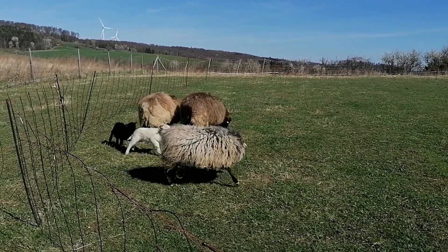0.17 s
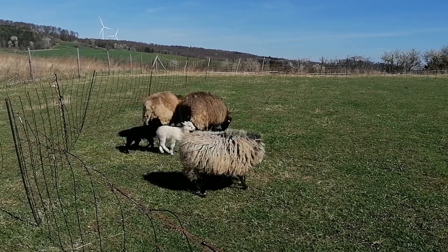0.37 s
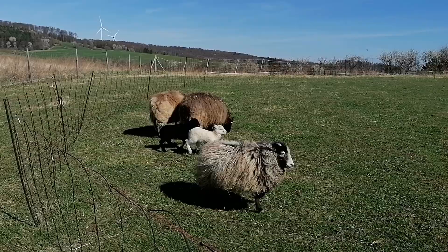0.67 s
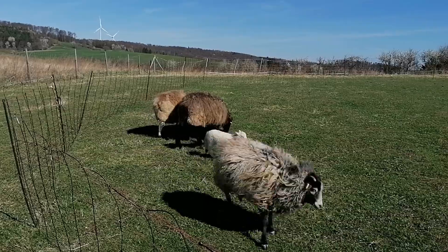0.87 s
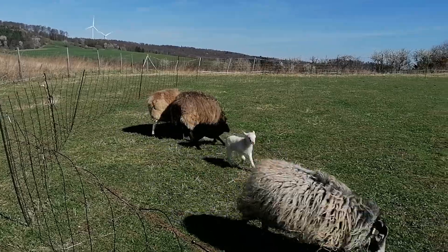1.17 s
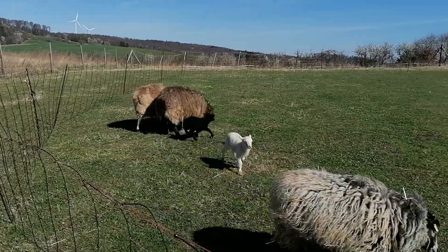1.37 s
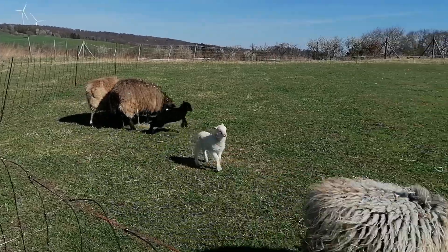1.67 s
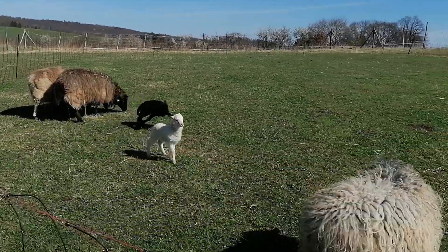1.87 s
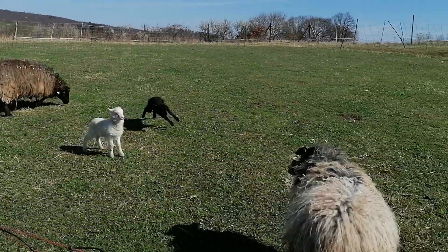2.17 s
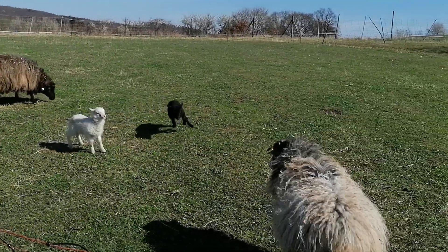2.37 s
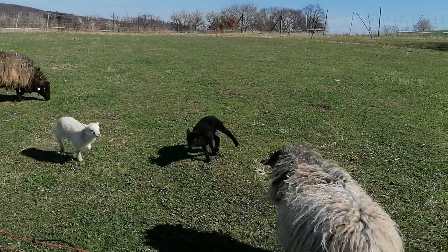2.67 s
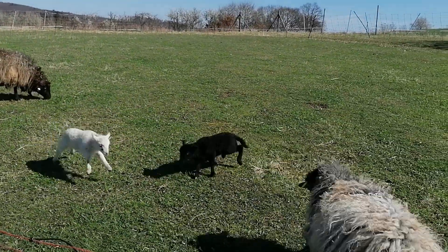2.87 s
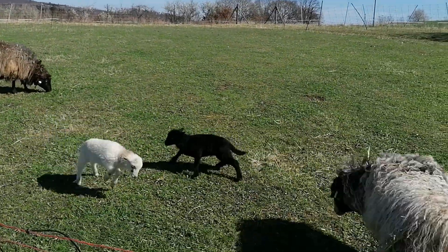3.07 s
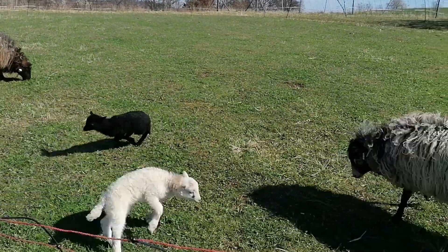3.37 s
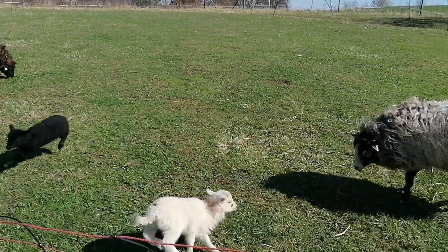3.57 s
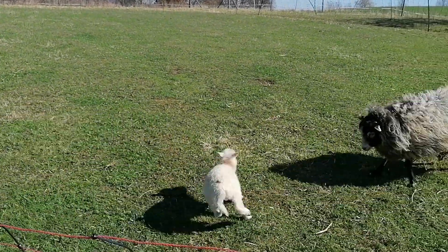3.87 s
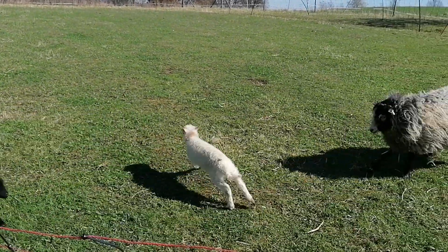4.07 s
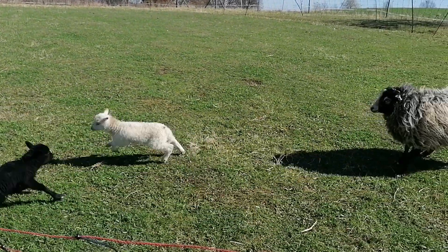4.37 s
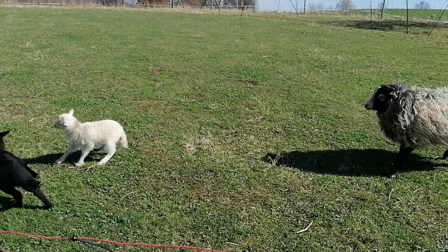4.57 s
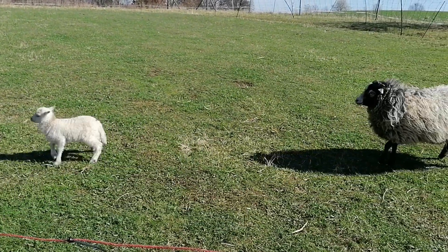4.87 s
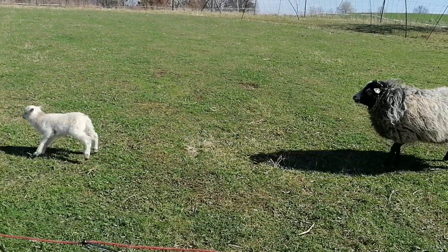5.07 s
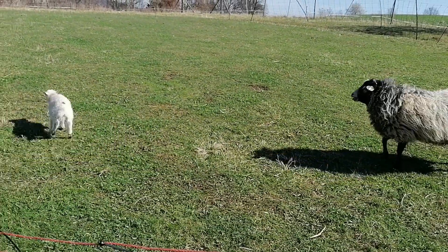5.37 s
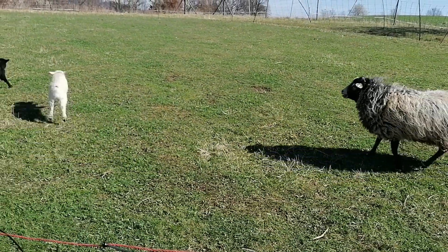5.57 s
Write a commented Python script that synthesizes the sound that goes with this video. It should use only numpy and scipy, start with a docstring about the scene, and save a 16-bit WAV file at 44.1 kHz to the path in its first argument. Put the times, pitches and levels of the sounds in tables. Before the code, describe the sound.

In an open pasture, a faint trembling lamb call gives way to grassy hoof steps and a close, rasping sheep bleat above low rotor rumble.

```python
"""Sheep on a pasture

A lamb gives a thin quavering bleat, hooves rustle through the grass, then a nearer sheep grunts and
bleats hoarsely in rasping bursts: vocal fold pulses and leaking air through throat, mouth and nose.
A distant helicopter throbs under it all (pulse trains and hum); filtered noise makes the swells of air,
tiny ticks the grass and one gliding sine a far bird."""
import sys
import numpy as np
from scipy import signal
from scipy.fft import rfft, irfft, next_fast_len
from scipy.io import wavfile
from scipy.ndimage import uniform_filter1d, map_coordinates

SR = 44100
rng = np.random.default_rng(int(sys.argv[2]) if len(sys.argv) > 2 else 0)


def store_pcm(level_fs):
    """Save levels as 16-bit WAV."""
    pcm = np.round(np.clip(level_fs, -1, 1) * 32767).astype(np.int16)
    wavfile.write(sys.argv[1], SR, np.atleast_2d(pcm).T)


N = 252252
TIME = np.arange(N) / SR


def amp(db):
    """Decibels to gain."""
    return 10 ** (np.asarray(db) / 20)


def unit(x):
    """Scale to rms 1."""
    return x / np.sqrt(np.mean(x ** 2) + 1e-20)


def curve(rows, axis=1):
    """One value per sample from a column of (t/s, ..) rows."""
    columns = np.transpose(rows)
    return np.interp(TIME, columns[0], columns[axis])


def wobble(rate):
    """A smooth random curve, rate knots a second."""
    return map_coordinates(rng.standard_normal(int(N * rate / SR) + 4), [TIME * rate])


def colour(x, points):
    """Causal minimum-phase filter with the gain of the (f/Hz, gain/dB) points."""
    m = 2 * next_fast_len(len(x))
    hz, db = np.transpose(points)
    gain = amp(np.interp(np.log(np.fft.rfftfreq(m, 1 / SR) + 1), np.log(hz), db))
    # folding the cepstrum gives the phase
    cepstrum = irfft(np.log(gain + 1e-6))
    cepstrum[1:m // 2] *= 2
    cepstrum[m // 2 + 1:] = 0
    return irfft(rfft(x, m) * np.exp(rfft(cepstrum)))[:len(x)]


def resonate(x, hz, width_hz):
    """One resonance."""
    return signal.lfilter(*signal.iirpeak(hz, hz / width_hz, SR), x)


def gliding(x, hz, width_hz):
    """A resonance whose frequency moves from sample to sample, rms 1."""
    carrier = np.exp(2j * np.pi * np.cumsum(hz) / SR)
    lowpass = signal.butter(2, width_hz / 2, fs=SR, output='sos')
    return unit((signal.sosfilt(lowpass, x / carrier) * carrier).real)


def noise(points):
    """Coloured noise of rms 1."""
    return unit(colour(rng.standard_normal(N), points))


def pulses(cycles, scatter_db):
    """A pulse of random size wherever the cycle count passes a whole number, rms 1."""
    at = np.interp(np.arange(1, int(cycles[-1]) + 1), cycles, np.arange(N))
    taps = np.round(at).astype(int)[:, None] + np.arange(-8, 9)
    # windowed sinc places each pulse between samples
    shape = np.sinc(taps - at[:, None]) * np.hanning(taps.shape[1])
    sizes = amp(scatter_db * rng.standard_normal((len(at), 1)))
    return unit(np.bincount(np.clip(taps, 0, N - 1).ravel(), (shape * sizes).ravel(), N))


def hump(centre_s, half_s, steep=2):
    """A rounded swell of height 1; steeper means flatter on top."""
    out = np.zeros(N)
    reach = 4 * abs(half_s)
    near = slice(*np.searchsorted(TIME, [centre_s - reach, centre_s + reach]))
    out[near] = np.exp(-np.abs((TIME[near] - centre_s) / half_s) ** steep)
    return out


def sized(x, db, length_s):
    """Give a short sound the level it has when spread over its length."""
    return x * amp(db) * np.sqrt(length_s * SR / (np.sum(x ** 2) + 1e-20))


def helicopter(first_pass=0.55, slap_lead_s=0.0035, overtones_db=-2):
    """Main blades thump twenty times a second, slapping harder when louder; the geared tail rotor hums."""
    # blade passes: t/s, rate/Hz
    blade_rate = [(0, 20.13), (2.2, 20.18), (3, 20.09), (4.2, 20.03), (5.7, 20.09)]
    # throb, swelling and fading on the wind: t/s, nominal level/dB
    rotor = [(0.0, -49.5), (0.67, -50.5), (1.1, -53.5), (4.64, -48), (4.76, -43), (5.64, -40.5),
             (5.72, -41.5)]
    # tail rotor overtones: t/s, nominal level/dB
    whine = [(0.0, -60), (0.67, -63), (2.7, -65.5), (3.05, -59), (3.8, -55), (4.32, -65), (5.69, -47)]
    # tail rotor overtones: multiple of the hum, relative level/dB
    tail_overtones = [(2, 2.5), (3, -14.5), (4, -8)]
    # thump spectrum: f/Hz, gain/dB
    thump_spectrum = [(10, -5), (20, -9), (40, 9.5), (60, 5.5), (82, 3.5), (120, -6), (160, -14),
                      (260, -28), (500, -68)]
    # against the mean throb; growth in dB for each dB of throb
    thump_db, slap_db, hum_db = -0.5, -7.5, -5
    thump_grows, slap_grows, hum_grows = 0.75, 1.92, 1.62

    passes = np.cumsum(curve(blade_rate)) / SR
    blades = pulses(passes + first_pass, scatter_db=.9)
    thumps = unit(colour(blades, thump_spectrum))
    early = np.interp(TIME + slap_lead_s, TIME, blades)
    slaps = unit(resonate(resonate(early, hz=86.5, width_hz=28.3), hz=91.0, width_hz=92))

    tail_turns = 4.61 * passes

    def tone(multiple):
        level = amp(2.6 * wobble(8))
        return level * np.sin(2 * np.pi * multiple * tail_turns + .9 * wobble(9))

    overtones = sum(amp(db) * tone(multiple) for multiple, db in tail_overtones)
    throb_db = curve(rotor)
    mean_db = throb_db.mean()

    def gain(db, grows):
        return amp(mean_db + db + grows * (throb_db - mean_db))

    main = gain(thump_db, thump_grows) * thumps + gain(slap_db, slap_grows) * slaps
    return main + gain(hum_db, hum_grows) * tone(1) + amp(curve(whine) + overtones_db) * overtones


def air(floor_db=-61, gust_width_hz=210, whoosh_db=-4.5, grows=1.53, roar_db=-1.0, roar_grows=1.28):
    """Low outdoor murk, a soft whoosh that rises in pitch as it swells, and a duller roar below it."""
    # murk spectrum: f/Hz, gain/dB
    floor_spectrum = [(50, -21), (100, -1), (139, -6.5), (239, -16), (413, -18.5), (615, -10.5),
                      (1160, -26), (4300, -41.5), (5540, -39.5), (6650, -39), (7280, -42.5), (7690, -58.5),
                      (10000, -74.5)]
    # spectrum of the noise behind whoosh and roar: f/Hz, gain/dB
    flow = [(60, -17.5), (150, 10), (750, -2.5), (950, -5.5), (1250, -33.5), (3000, -40.5)]
    # low rush of air: t/s, nominal level/dB
    whoosh_levels = [(0.0, -54), (0.24, -72.5), (1.1, -58.5), (1.35, -65), (2.4, -69.5), (2.82, -56.5),
                     (3.08, -48), (3.38, -57), (4.3, -63.5), (4.72, -52.5), (4.95, -55), (5.08, -48),
                     (5.23, -44.5), (5.37, -45), (5.53, -57.5), (5.72, -57.5)]
    # dull roar: t/s, nominal level/dB
    roar_levels = [(0.0, -60.5), (0.21, -62), (2.75, -62.5), (2.85, -60.5), (3.95, -63), (5.02, -53.5),
                   (5.1, -47), (5.32, -46), (5.72, -58)]
    weak_db, strong_db, weak_hz, strong_hz = -61.5, -48, 514, 666

    def swell(db, grows):
        return amp(db.mean() + grows * (db - db.mean()))

    floor = amp(floor_db + 1.5 * wobble(4)) * noise(floor_spectrum)
    level_db = curve(whoosh_levels)
    centre_hz = np.interp(level_db, [weak_db, strong_db], [weak_hz, strong_hz])
    whoosh = gliding(noise(flow), centre_hz, gust_width_hz)
    roar = unit(amp(2.3 * wobble(30)) * resonate(noise(flow), hz=370, width_hz=410))
    out = floor + amp(whoosh_db) * swell(level_db, grows) * whoosh
    return out + amp(roar_db) * swell(curve(roar_levels), roar_grows) * roar


def crackle(centre_hz, spread_octaves, grains_per_s, life_s):
    """Dense tiny ticks, each a decaying sine with its own pitch and size, rms 1."""
    when, pitch, size = rng.random((int(grains_per_s * N / SR), 3)).T[:, :, None]
    t = TIME[:SR // 200]
    hz = centre_hz * 2 ** (spread_octaves * (2 * pitch - 1))
    envelope = np.exp(-t / life_s) * (1 - np.exp(-2 * t / life_s))
    ticks = amp(-3.2 * np.log(size + 0.015)) * np.sin(2 * np.pi * hz * t) * envelope
    at = (when * N).astype(int) + np.arange(len(t))
    return unit(np.bincount(at.ravel(), ticks.ravel(), N)[:N])


def grass(crunch_db=-3, swish_db=0, flutter_db=1.8):
    """Hooves crunch the turf and brush the blades; now and then a dry stalk snaps."""
    # running through the grass: t/s, nominal level/dB
    rustle = [(1.3, -76.5), (2.15, -74.5), (2.65, -79), (2.85, -75), (2.92, -63.5), (3.28, -73),
              (3.98, -71.5), (4.45, -82)]
    # hoof strokes that stand out: centre t/s, length/s, crunch level/dB, fine swish level/dB
    steps = [(0.35, 0.019, -63.5, -67), (1.583, 0.017, -73, -67), (1.823, 0.15, -69, -70),
             (2.084, 0.071, -69, -74), (2.768, 0.018, -64, -65), (2.99, 0.036, -70.5, -78),
             (3.093, 0.076, -63.5, -67), (3.21, 0.052, -70, -72), (3.38, 0.072, -78, -65.5),
             (3.479, 0.04, -77, -62.5), (3.577, 0.023, -62, -59.5), (3.651, 0.035, -67, -65),
             (3.85, 0.15, -94, -65.5), (4.076, 0.029, -83, -63.5), (4.221, 0.069, -84, -68),
             (4.376, 0.13, -80, -70), (4.535, 0.052, -82, -66.5), (4.624, 0.049, -81, -60.5),
             (4.89, 0.0051, -86, -62)]
    # dry stalks: t/s, peak level/dB, f/Hz, splintering against the tick (ratio)
    snaps = [(0.518, -47.5, 3870, 2.4), (0.982, -46, 4540, 0.86), (1.188, -53, 2960, 2.3),
             (2.0707, -47, 1855, 1.5), (2.7285, -43, 6350, 1.2), (2.91, -34, 6500, 1.2),
             (2.9864, -51, 5780, 1), (3.0968, -36, 6700, 0.64), (3.1186, -52, 3580, 1.2),
             (3.7065, -43.5, 6900, 1), (3.8196, -35, 6840, 0.083), (4.3264, -45, 7100, 0.55),
             (4.9508, -50.5, 6700, 1.2)]

    running = amp(curve(rustle))
    tread = amp(crunch_db) * running + sum(amp(db) * hump(s, length / 2) for s, length, db, _ in steps)
    brush = amp(swish_db) * running + sum(amp(db) * hump(s, length / 2) for s, length, _, db in steps)
    crunch = crackle(3200, spread_octaves=.85, grains_per_s=2200, life_s=0.0004)
    swish = crackle(6630, spread_octaves=0.28, grains_per_s=2600, life_s=0.00018)
    out = tread * amp(flutter_db * wobble(90)) * crunch
    out += brush * amp(flutter_db * wobble(90)) * swish

    t = TIME[:SR // 20]
    for s, db, hz, splinter in snaps:
        tick = np.sin(2 * np.pi * hz * t) * np.exp(-t / 0.0011)
        # the fibres splinter for a few milliseconds more
        fibres = resonate(rng.standard_normal(len(t)), hz=0.86 * hz, width_hz=3200) * np.exp(-t / 0.0061)
        snap = tick + splinter * fibres
        out[round(s * SR):][:len(t)] += amp(db) * snap / np.abs(snap).max()
    return out


def quaver_pitch(centre_s, length_s, top_hz):
    """Pitch in Hz: every quaver starts tight, jumps to its top, holds if it is long and sags to a creak."""
    onset_hz, creak_hz = 261, 198.4
    # tight this long around the start; at the top after this share of the length
    tight_s, rise_share = 0.0091, 0.38
    # the sag runs from before the end to past it
    sag_s, sag_past_s = 0.019, 0.017

    knots = []
    for start, length, hz in zip(centre_s - length_s / 2, length_s, top_hz):
        top = start + rise_share * length
        knots += [(start - tight_s, onset_hz),
                  (min(start + tight_s, (start + top) / 2), onset_hz),
                  (top, hz),
                  (max(top, start + length - sag_s), hz),
                  (start + length + sag_past_s, creak_hz)]
    return curve(sorted(knots))


def lamb(between=0.085, edge_between=0.1, edge_lag_s=0.003, jitter=0.069, creak_size=0.83,
         break_db=-10, flare_db=-11):
    """Vocal fold pulses whose pitch and force arch in each quaver, through mouth and nose."""
    # quavers: centre t/s, length/s, top pitch f/Hz, mouth level/dB, nasal edge level/dB,
    # strongest side resonance f/Hz, its level/dB
    quavers = [(0.456, 0.032, 286.7, -69, -58.5, 4440, -60), (0.54, 0.038, 294.3, -67.5, -59, 4250, -68),
               (0.68, 0.094, 281.2, -51, -45.5, 4240, -56.5), (0.783, .041, 306.5, -49.5, -48, 3360, -84),
               (0.86, 0.042, 307.8, -49.5, -52, 3330, -55), (0.941, .05, 302.7, -56.5, -59, 2471, -69),
               (1.035, 0.058, 287, -61, -60.5, 3500, -86), (1.101, 0.071, 285.2, -62, -61.5, 2520, -73)]
    # mouth resonances: f/Hz, gain/dB
    mouth_spectrum = [(500, -38), (620, -4.5), (850, -29), (1120, -15), (1390, 3), (1700, -20), (2150, -47),
                      (2520, -15), (2750, -44), (3470, -7), (4000, -16.5), (4550, -10.5), (5200, -49)]
    # nasal resonances: f/Hz, gain/dB
    edge_spectrum = [(4300, -19), (5050, -6), (5350, 1), (5650, 2.5), (6060, 8), (6400, -3), (6800, -3),
                     (7600, -27)]
    # share of breath noise in the strongest and in the weakest quaver
    rough_loud, rough_soft = 0.056, 0.347

    s, length, top_hz, mouth_db, edge_db, ring_hz, ring_db = np.transpose(quavers)
    bounds = np.ravel([s - length / 2, s + length / 2], 'F')

    def step(column):
        return np.interp(TIME, bounds, np.repeat(column, 2))

    # long notes hold level, short quavers swell and fade
    firmness = length / .017

    def arches(lag_s):
        return sum(hump(c + lag_s, d / 2, f) for c, d, f in zip(s, length, firmness))

    push, late = arches(0), arches(edge_lag_s)
    voiced = uniform_filter1d(1. * ((TIME > s[0]) & (TIME < s[-1])), size=400)
    loudness_range = [mouth_db.min(), mouth_db.max()]
    roughness = np.clip(np.interp(step(mouth_db), loudness_range, [rough_soft, rough_loud]), 0, 1)
    pitch_hz = quaver_pitch(s, length, top_hz) * (1 + jitter * roughness * wobble(120))
    cycles = np.cumsum(pitch_hz) / SR
    # air leaks through the folds once a cycle
    leak = unit(rng.standard_normal(N) * np.exp(-4 * (cycles % 1)))
    folds = np.sqrt(1 - roughness) * pulses(cycles, scatter_db=2.7) + np.sqrt(roughness) * leak

    # from the fourth quaver on: a bright creak first, a break upward, a flare as the mouth opens
    creak = creak_size * sum(hump(c - .022, 0.0066) for c in s[3:])
    breaks = sum(hump(c - .007, 0.0075) for c in s[3:])
    flare_tone = unit(resonate(resonate(folds, hz=1600, width_hz=160), hz=1760, width_hz=310))
    flare = amp(flare_db) * sum(hump(c, 0.022) for c in s[3:]) * flare_tone

    mouth_force = push + between * voiced * (1 - push)
    mouth = amp(step(mouth_db)) * (mouth_force * unit(colour(folds, mouth_spectrum)) + flare)
    edge_force = late + creak + edge_between * voiced * (1 - late)
    edge = amp(step(edge_db) + break_db * breaks) * edge_force * unit(colour(folds, edge_spectrum))
    ring = amp(step(ring_db)) * push * gliding(folds, step(ring_hz), width_hz=320)
    return mouth + edge + ring


def bird(db=-71):
    """One thin, far whistle: a gliding sine."""
    # whistle: t/s, f/Hz
    chirp = [(1.385, 3640), (1.41, 3540), (1.455, 3650)]
    return amp(db) * hump(1.42, 0.03, 2.6) * np.sin(2 * np.pi * np.cumsum(curve(chirp)) / SR)


def rattle(cycles, leak_share):
    """Slack vocal folds: one pulse a cycle, each followed by a puff of air."""
    share = np.clip(leak_share, 0, 1)
    leak = unit(rng.standard_normal(N) * np.exp(-1.7 * (cycles % 1)))
    return np.sqrt(1 - share) * pulses(cycles, scatter_db=1.8) + np.sqrt(share) * leak


def hoarse_bleat(throat_width_hz=48, steep=4.3, trail_db=-22, upper_width_hz=520, grunt_nasal_db=-11,
                 leak_share=0.7, jitter=0.028, linger_db=-9, grunt_hz=185, grunt_trail_db=-20):
    """Muffled grunts, then slack folds rattle in bursts that ring the throat, ever less nasal as it opens."""
    # grunts: centre t/s, length/s, level/dB
    grunts = [(4.972, .008, -67), (4.997, 0.006, -58), (5.055, 0.0063, -48), (5.069, 0.0054, -48),
              (5.13, 0.022, -42)]
    # grunt spectrum: f/Hz, gain/dB
    grunt_spectrum = [(500, -22), (900, -14), (1250, 15), (1700, -8.5), (2050, 5), (2350, -7.5), (2620, 2),
                      (2950, -25.5), (3120, -6), (4000, -23.5), (8000, -50)]
    # bursts: centre t/s, length/s, pitch f/Hz, nominal throat level/dB, upper resonance drive/dB,
    # catch level/dB
    bursts = [(5.214, 0.018, 181, -25.5, -44, -58), (5.29, 0.027, 187, -31, -38.5, -55),
              (5.366, .026, 190, -25, -37.5, -43.5), (5.442, 0.023, 194.8, -24.5, -40, -45),
              (5.518, 0.021, 193.1, -26, -34, -46.5), (5.592, 0.021, 193.7, -24.5, -37, -50),
              (5.672, 0.022, 259.7, -25.5, -32.5, -44.5)]
    # voice cutting out inside a burst: t/s, depth (0-1)
    hitches = [(5.287, 1), (5.367, 0.8), (5.44, 0.3), (5.514, .55)]
    # rasp spectrum: f/Hz, gain/dB
    rasp_spectrum = [(400, -21.5), (620, 7), (950, 6), (1110, -9.5), (1350, 2), (1550, 2.5), (1830, 7),
                     (2050, -3), (2400, -4.5), (2650, 9.5), (2980, -3), (3300, -17), (3550, -23),
                     (4250, -19.5), (5200, -33), (6600, -22), (8000, -40.5)]
    # nasal spectrum: f/Hz, gain/dB
    nasal_spectrum = [(4750, -14.5), (5050, -4), (5280, 4), (5900, 1), (6400, -10), (8000, -16)]
    # mouth nearly shut, then wide open; time constant of its opening from the first burst on
    throat_ends_hz, rasp_ends_db, nasal_ends_db = (723, 767), (-36.5, -31.5), (-49.5, -69.5)
    opening_s = 0.18
    # the folds catch before each burst: two tight squeaks, the second lower
    catch_hz, catch_lead_s, squeak_gap_s, squeak_decay_s = (3650, 3050), .028, 0.0075, 0.006
    # narrow resonances that ring on between the bursts
    linger_hz = (1856, 3020)
    # the upper resonance lifts as the throat shuts after each burst
    upper_base_hz, upper_rise_hz = 2684, 780

    s = np.transpose(bursts)[0]

    def opened(t, shut, wide):
        return wide + (shut - wide) * np.exp(-np.maximum(t - s[0], 0) / opening_s)

    # jittered time in s; times a pitch it counts cycles
    bend = np.cumsum(1 + jitter * wobble(200)) / SR
    hitch = 1 - np.clip(sum(depth * hump(c, 0.0024) for c, depth in hitches), 0, 1)
    grunt = unit(colour(rattle(grunt_hz * bend, leak_share), grunt_spectrum))
    nasal, breath = noise(nasal_spectrum), noise(rasp_spectrum)
    tract = colour(signal.unit_impulse(1024), rasp_spectrum)
    squeaks = [unit(resonate(rng.standard_normal(N), hz, width_hz=170)) + .5 * breath for hz in catch_hz]
    out, drive = np.zeros(N), np.zeros(N)

    for c, length, db in grunts:
        swell = hump(c, length / 2)
        out += sized(grunt * (swell + amp(grunt_trail_db) * hump(c, length * 2)), db, length)
        out += amp(db + grunt_nasal_db) * nasal * swell

    for c, length, pitch_hz, throat_db, upper_db, catch_db in bursts:
        throat_hz = opened(c, *throat_ends_hz)
        rasp_db = opened(c, *rasp_ends_db)
        nasal_db = opened(c, *nasal_ends_db)
        # the first pulse comes as the burst opens
        cycles = pitch_hz * bend
        cycles = cycles - np.interp(c - .44 * length, TIME, cycles) % 1
        folds = rattle(cycles, leak_share) * hitch
        burst = folds * hump(c - .001, length / 2, steep)

        # the throat rings with the clean part of the voice
        clean = rattle(cycles, leak_share=.08) * hump(c - .0035, length * 0.44, steep)
        ring = resonate(resonate(clean, throat_hz, throat_width_hz), throat_hz, width_hz=254)
        out += sized(ring * hitch, throat_db - 0.5, length)
        out += sized(signal.oaconvolve(burst, tract)[:N], rasp_db, length)
        linger = sum(resonate(burst, hz, width_hz=65) for hz in linger_hz)
        out += sized(linger, rasp_db + linger_db, length)

        age_s = TIME - (c - catch_lead_s)
        out += amp(nasal_db) * nasal * (age_s > 0) * hump(c - .007, length * 1.3)
        out += amp(rasp_db + trail_db) * breath * hump(c + .006, 0.032)
        for k, squeak in enumerate(squeaks):
            since_s = age_s - k * squeak_gap_s
            out += amp(catch_db) * squeak * (since_s > 0) * np.exp(-np.abs(since_s) / squeak_decay_s)
        drive += amp(upper_db) * hump(c + .002, .0105) * folds

    upper_hz = upper_base_hz + upper_rise_hz * sum(hump(c + .015, .0065) for c in s)
    return out + np.std(drive) * gliding(drive, upper_hz, upper_width_hz)


def scene(lamb_scatter_db=-11, sheep_scatter_db=-11.5):
    """Open field: the turf scatters both voices into a short noise tail; all else is dry."""
    far, near = lamb(), hoarse_bleat()
    # falls 60 dB in 77 ms
    tail = rng.standard_normal(SR // 2) * amp(-60 * TIME[:SR // 2] / 0.077)
    voices = amp(lamb_scatter_db) * far + amp(sheep_scatter_db) * near
    echo = signal.fftconvolve(voices, tail / np.linalg.norm(tail))[:N]
    return (far + near + echo + helicopter() + air() + grass() + bird())[None]


def record(dry):
    """The recorder's band limit: a linear-phase lowpass."""
    top_hz = 7550
    return signal.fftconvolve(dry, signal.firwin(241, top_hz, fs=SR)[None], 'same', axes=1)


dry = scene()
out = record(dry)
store_pcm(out)
```